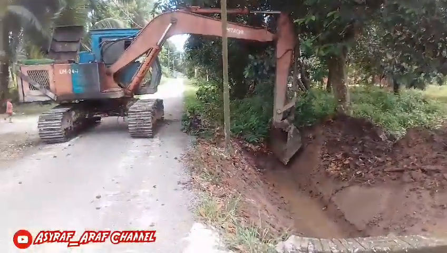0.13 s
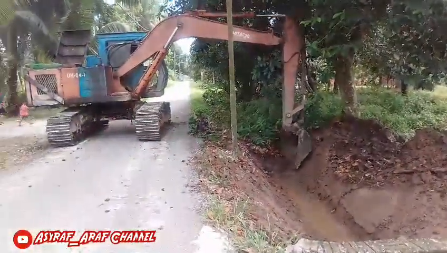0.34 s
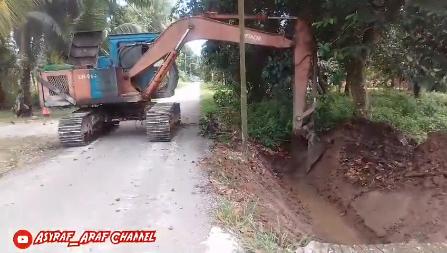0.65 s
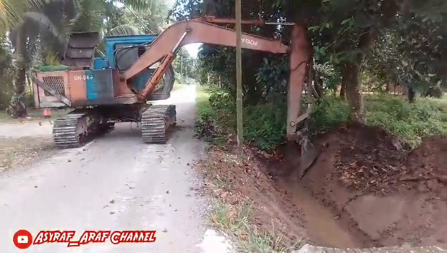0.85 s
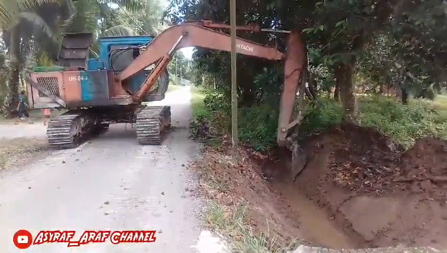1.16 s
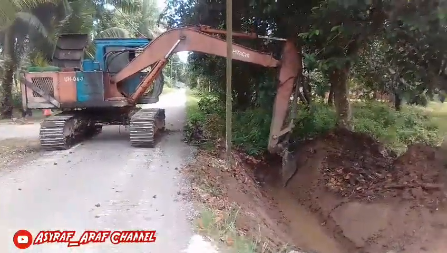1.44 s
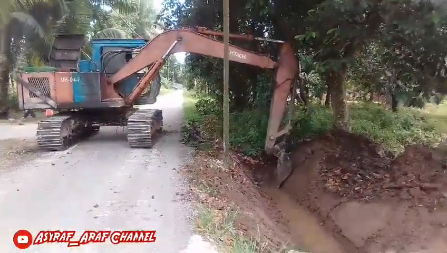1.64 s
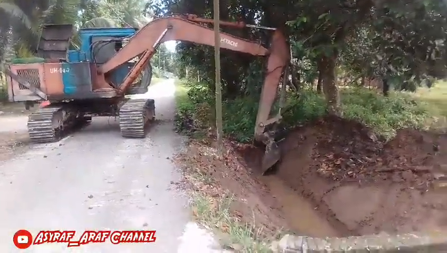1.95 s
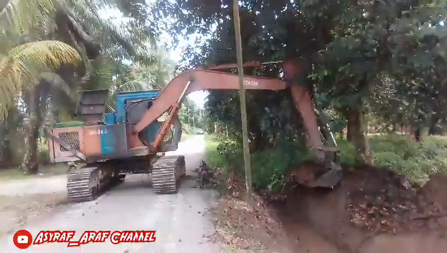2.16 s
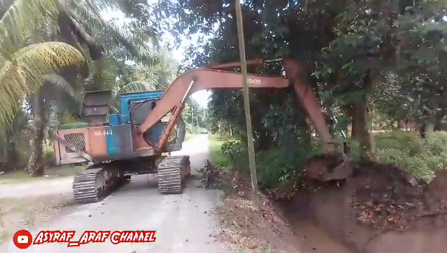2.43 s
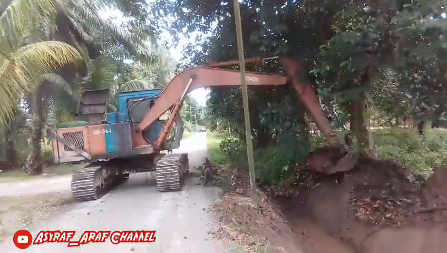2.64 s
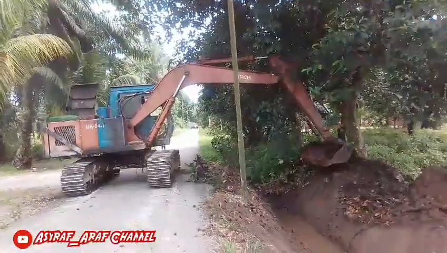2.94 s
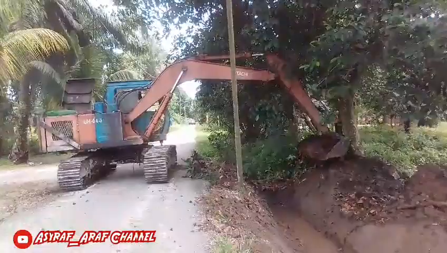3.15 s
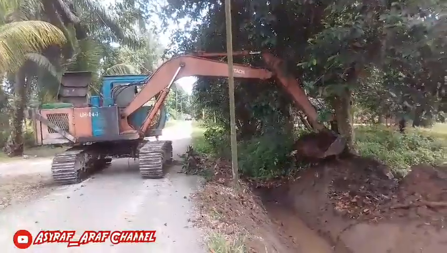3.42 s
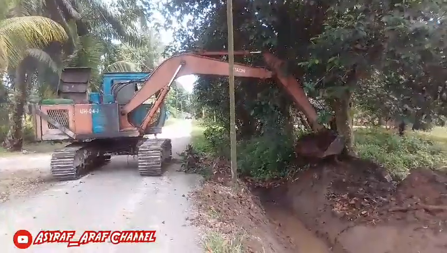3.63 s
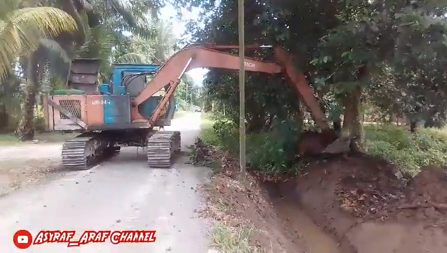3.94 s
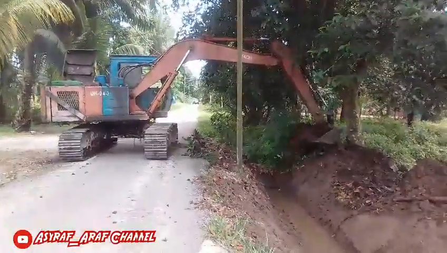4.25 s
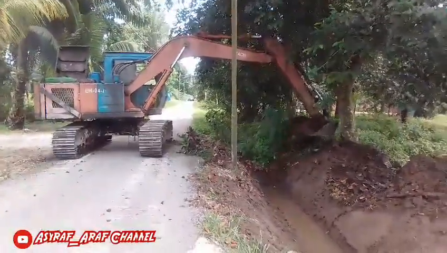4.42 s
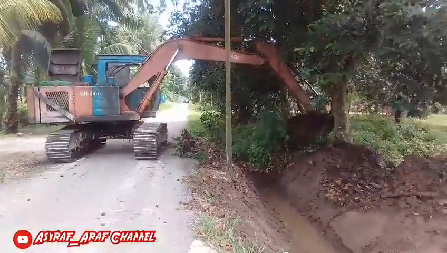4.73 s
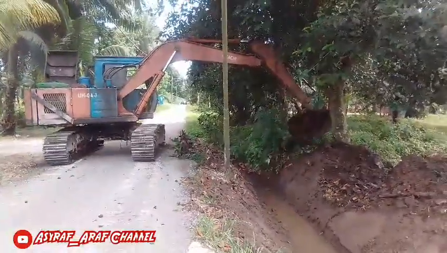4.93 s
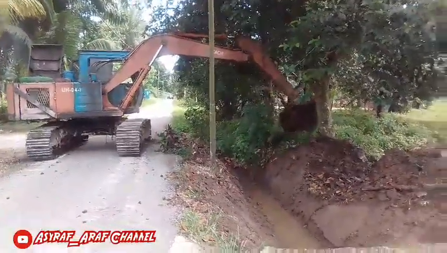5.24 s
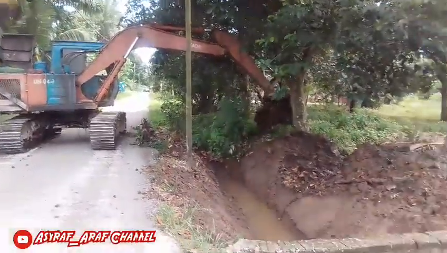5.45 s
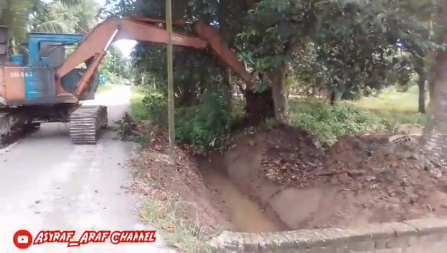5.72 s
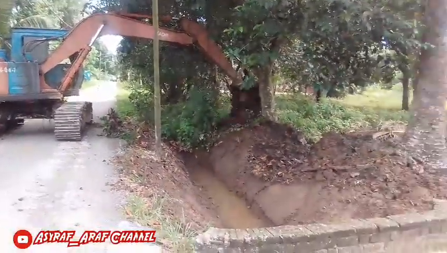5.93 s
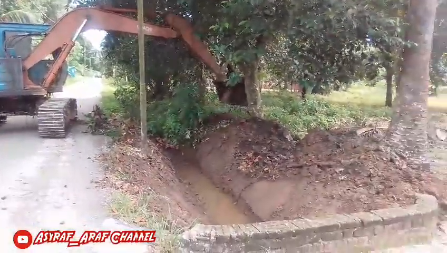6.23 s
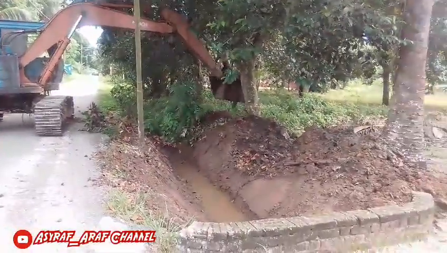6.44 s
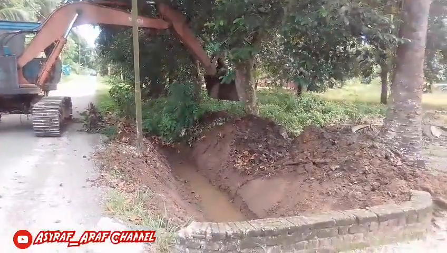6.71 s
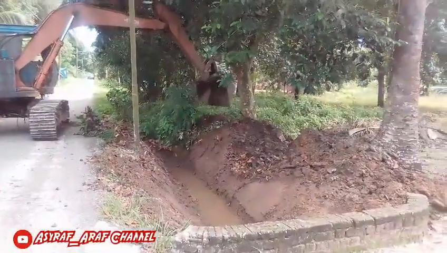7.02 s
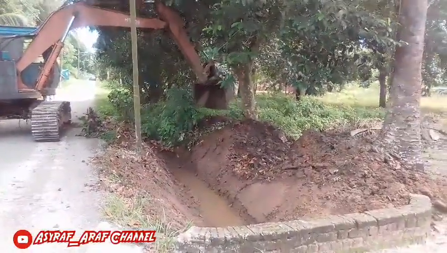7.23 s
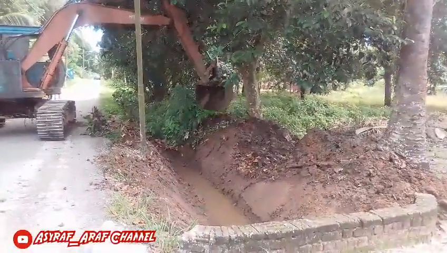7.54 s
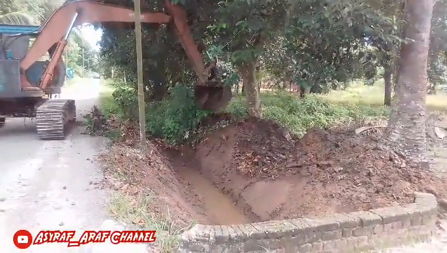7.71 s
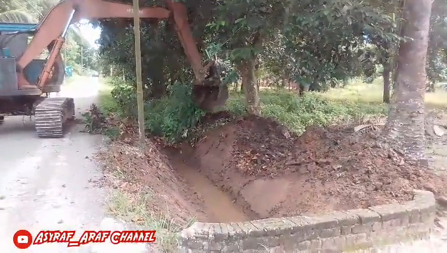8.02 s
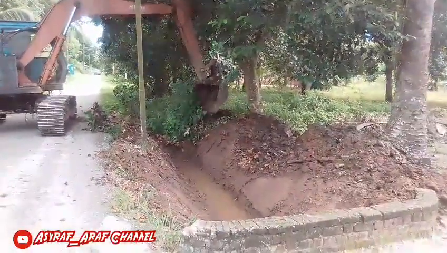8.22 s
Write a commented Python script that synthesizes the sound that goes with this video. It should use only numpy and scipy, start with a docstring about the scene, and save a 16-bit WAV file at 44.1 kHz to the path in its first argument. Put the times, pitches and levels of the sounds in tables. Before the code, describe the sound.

A diesel excavator runs steadily with a hydraulic whine while its bucket and arm clank and scrape, the sound briefly cutting out once.

```python
"""Diesel crawler excavator working a ditch a few metres off. Four cylinders fire at near-steady speed;
fan and block roar with low and mid body tones; the hydraulic pump whines and throbs. Bucket and arm clank
and shed soil: noise bursts, ringing steel, a few thin pings, all echoed by trees and the machine's body.
Small microphone: bright peak near 3.6 kHz in the roar. The sound drops out for 0.8 s."""
import sys
import numpy as np
from scipy import signal
from scipy.fft import rfft, irfft, next_fast_len
from scipy.io import wavfile

SR = 44100
rng = np.random.default_rng(int(sys.argv[2]) if len(sys.argv) > 2 else 0)


def wav_record(signal):
    """Record a signal, one row per channel, as 16-bit PCM in the file named by sys.argv[1]."""
    frames = np.transpose(np.atleast_2d(signal))
    bounded = np.clip(frames, -1, 1)
    # unit amplitude maps onto the largest positive 16-bit level
    quanta = np.round(bounded * 32767).astype(np.int16)
    wavfile.write(sys.argv[1], SR, quanta)


N = 369116
N_FFT = next_fast_len(N, True)

# thin high pings: t/s, level/dB, f/Hz, t60/s
HIGH_PINGS = [(1.458, -57, 10800, .2), (2.99, -53, 9800, .9), (3.39, -58, 9900, .6),
              (3.55, -44, 12530, 0.26), (3.86, -48, 10800, .15), (3.889, -53, 13200, .1),
              (4.15, -53, 13300, .15), (5.93, -47, 7400, .2), (6.088, -44, 7340, 0.061)]
# jolts of bucket and arm: t/s, relative level/dB, t60/s, part
JOLTS = [(.127, -17, .07, "bucket"), (.25, -20.5, 0.27, "boom"), (.272, -11, .28, "scrape"),
         (1.55, -19.5, 0.32, "boom"), (2.952, -3, 0.17, "pin"), (2.966, -8, .28, "bucket"),
         (3.008, -4, .3, "scrape"), (3.055, -13, .26, "scrape"), (3.146, -14, .15, "arm"),
         (3.165, -10.5, 0.18, "scrape"), (3.178, -15.5, .2, "boom"), (3.329, -9, 0.077, "link"),
         (3.385, -16.5, .14, "link"), (3.41, -11, .25, "scrape"), (3.44, -20, .14, "link"),
         (3.473, -15.5, .1, "link"), (3.556, -14, 0.19, "link"), (3.56, -18, 0.22, "base"),
         (3.92, -16.5, 0.41, "scrape"), (4.226, -13.5, 0.37, "scrape"), (4.485, -16, .29, "link"),
         (4.519, -12, .25, "plate"), (4.545, -10.5, .33, "scrape"), (4.785, -12.5, 0.18, "bucket"),
         (5.036, -16, .09, "link"), (5.297, -7, .13, "pin"), (5.3, -9, .15, "plate"),
         (5.309, -15, 0.27, "arm"), (5.824, -17, .4, "arm"), (5.866, -11.5, .2, "scrape"),
         (5.911, -3, 0.15, "bucket"), (5.925, -6.5, 0.4, "scrape"), (5.95, -15.5, .22, "boom"),
         (6.012, -13, .5, "bucket"), (6.08, -15, 0.46, "scrape"), (6.28, -23, 0.31, "boom"),
         (6.871, -18, .15, "base"), (6.89, -17, 0.1, "bucket"), (7.354, -25, .12, "tooth")]
# struck or scraped part -> rise/s, thud/dB, treble/dB, low ring f/Hz, high ring f/Hz
STRUCK_PARTS = {"boom": (.005, 3.5, -37.5, 298, 3601), "bucket": (.0022, -1.5, -39, 800, 3480),
                "plate": (.003, -8, -26, 400, 5400), "scrape": (.008, -2, -35, 880, 3720),
                "link": (.003, -2.5, -42, 750, 2550), "arm": (.003, 2.5, -43, 800, 2050),
                "pin": (.003, -14, -19.5, 700, 3900), "tooth": (.002, -10, -2, 800, 4100),
                "base": (.006, 6, -36, 205, 2750)}
# noise spectrum of a jolt: f/Hz, relative density/dB
JOLT_SPECTRUM = [(59, -40.5), (100, -6), (205, -7.5), (254, -2), (532, -8.5), (701, -7), (779, -9.5),
                 (2340, -10.5), (3500, -8.5), (5700, -24), (15700, -55.5)]
# steel modes of bucket and arm: f/Hz, gain/dB, t60/s
STEEL_MODES = [(196, 10, .12), (295.4, 8.5, 0.12), (402, 4, 0.11), (563, -2, 0.13), (720, -2, 0.092),
               (865, 2.5, 0.032), (997, -6.5, .1), (1419, 4, 0.13), (1760, -1.5, .08), (2040, 1, 0.087),
               (2484, -1.5, .08), (2810, 0, 0.061), (3050, -10, .08), (3405, 1.5, 0.04), (3503, -4.5, 0.11),
               (3534, -4, .1), (3640, 0.5, 0.054), (3850, -6.5, 0.14), (4060, -1, 0.071),
               (4370, -1.5, 0.037), (5280, -6.5, 0.092)]
# fan and block roar: t/s, level/dB, mid and treble gain/dB
ROAR_LEVELS = [(0, -24.5, -5.5), (.43, -22.5, -6), (.8, -25, -6), (1.8, -25, -5), (2.63, -27.5, -4),
               (3.1, -24, -2.5), (3.55, -22.5, -5.5), (4.05, -25.5, -5), (4.6, -25, -1.5),
               (5.2, -24.5, -3.5), (6.4, -25.5, -4.5), (7.1, -26.5, -2.5), (8.37, -26, -4)]
# roar spectrum: f/Hz, relative density/dB
ROAR_SPECTRUM = [(30, -44), (66, -30.5), (95, -19), (130, -14.5), (200, -7), (370, -15), (630, -14.5),
                 (1100, -14.5), (2000, -14.5), (3790, -10.5), (5500, -26), (7500, -37.5), (10500, -45),
                 (16000, -56.5)]
# roar peaks (low and mid body tones, microphone's bright peak near 3.6 kHz): f/Hz, width/Hz, lift/dB
ROAR_PEAKS = [(302, 49, 3), (798, 166, 7), (960, 58, 5.5), (3500, 330, 0.5), (3890, 600, 3.5),
              (4530, 760, 2.5)]
# pump whine: t/s, 1st harmonic level/dB, 3rd harmonic level/dB, beating order/1st (amplitude ratio)
PUMP_LEVELS = [(0, -35, -44.5, .7), (.42, -32, -47, .6), (.8, -35, -55, .3), (1.3, -32.5, -44, .15),
               (1.8, -33.5, -51, .2), (2.7, -33, -43.5, .3), (3.4, -34.5, -44, .3), (4.3, -33.5, -42, .6),
               (4.9, -32.5, -40.5, .3), (5.6, -38.5, -43, .7), (6.1, -41.5, -39, .8),
               (6.8, -39.5, -40.5, .3), (7.4, -38, -41.5, .8), (8.37, -37.5, -39.5, .8)]
# other pump overtones: harmonic number, level/dB re 3rd
PUMP_OVERTONES = [(2, -3), (4, -1.5), (5, -6.5)]
# engine speed, sagging under load: t/s, firing rate/Hz
FIRING_RATE = [(0, 58.3), (1.8, 58.3), (2.7, 57.9), (3.05, 57.8), (3.35, 58.2), (4.2, 58.3), (4.55, 57.4),
               (4.9, 57.4), (5.45, 57.8), (6.05, 58.1), (6.9, 58.1), (7.3, 57.95), (8.37, 58)]
# 2nd firing harmonic: t/s, level/dB
SECOND_HARMONIC = [(0, -38), (1.2, -37.5), (2.8, -41.5), (4.2, -39), (4.8, -47.5), (5.6, -41), (6.3, -45.5),
                   (6.9, -42), (7.3, -45), (8.37, -40.5)]
# weak engine orders: multiple of firing rate, level/dB
WEAK_ORDERS = [(2.5, -58), (3.5, -51), (4, -48.5), (5, -47.5), (7.5, -45.5)]


def amp(db):
    """dB to gain."""
    return 10 ** (np.asarray(db) / 20)


def unit_rms(x):
    """Scale to rms 1."""
    return x / np.sqrt(np.mean(x ** 2) + 1e-20)


def curves(table):
    """Columns after t/s, interpolated per sample."""
    times_s, *columns = np.transpose(table)
    return [np.interp(np.arange(N) / SR, times_s, column) for column in columns]


def drift(rate_hz):
    """Low-passed random wander, rms 1."""
    step = 40
    pole = np.exp(-2 * np.pi * rate_hz * step / SR)
    noise = rng.standard_normal(N // step + 2002)
    slow = signal.lfilter([1], [1, -2 * pole, pole * pole], noise)[2000:]
    return np.interp(np.arange(N) / step, np.arange(len(slow)), unit_rms(slow))


def noise_bands(spectrum, low_hz, high_hz, peaks=()):
    """Coloured noise with resonant peaks, split into low, mid, high."""
    hz = np.arange(1, N_FFT // 2 + 2) * SR / N_FFT
    points_hz, points_db = np.transpose(spectrum)
    db = np.interp(np.log(hz), np.log(points_hz), points_db)
    for centre_hz, width_hz, lift_db in peaks:
        db += lift_db / (1 + (2 * (hz - centre_hz) / width_hz) ** 2)
    bins = rfft(rng.standard_normal(N_FFT)) * amp(db)
    low, high = 1 / (1 + (hz / low_hz) ** 4), 1 / (1 + (high_hz / hz) ** 4)
    return [irfft(bins * share, N_FFT)[:N] for share in (low, 1 - low - high, high)]


def ring(force, hz, t60_s):
    """Damped mode: a unit click rings a sine of height 1."""
    r, w = amp(-60 / (t60_s * SR)), 2 * np.pi * hz / SR
    return signal.lfilter([0, np.sin(w)], [1, -2 * r * np.cos(w), r * r], force + 1e-18)


def tone(cycles, multiple, rms_db):
    """Sine on a multiple of a cycle count, random phase."""
    return np.sqrt(2) * amp(rms_db) * np.sin(2 * np.pi * (multiple * cycles + rng.random()))


def echoes(x, wet_db=-13, t60_s=.39, gap_s=.012):
    """Direct sound plus dense, fading scatter off trees and machine body."""
    t = np.arange(round(.4 * SR)) / SR
    scatter = rng.standard_normal(len(t)) * amp(-60 * t / t60_s) * (t > gap_s)
    scatter = unit_rms(scatter) / np.sqrt(len(t))
    return x + amp(wet_db) * signal.fftconvolve(x, scatter)[:N]


def pings():
    """Short high tones: sudden start, slightly rough decay."""
    out = np.zeros(N)
    for start_s, db, hz, t60_s in HIGH_PINGS:
        t = np.arange(round(t60_s * SR)) / SR
        out[round(start_s * SR):][:len(t)] += amp(db - 60 * t / t60_s) * np.sin(2 * np.pi * hz * t)
    return out * amp(5.2 * drift(150))


def clanks(crash_db=-11, steel_db=-22, strike_db=13, grains_per_s=900, db_per_octave=22):
    """Each jolt: a blow and a dying rattle. Both ring steel modes near the part's ring frequencies."""
    modes_hz = np.array(STEEL_MODES)[:, 0]
    band_powers = np.zeros((3, N))
    rattle_envs, strikes = np.zeros((2, len(STEEL_MODES), N))
    spreads = rng.standard_normal((len(JOLTS), len(STEEL_MODES)))
    for (start_s, db, t60_s, part), spread in zip(JOLTS, spreads):
        rise_s, thud_db, treble_db, low_hz, high_hz = STRUCK_PARTS[part]
        t, at = np.arange(round(t60_s * SR)) / SR, round(start_s * SR)
        envelope = (1 - np.exp(-t / rise_s)) * amp(db - 60 * t / t60_s)
        band_powers[:, at:at + len(t)] += (envelope * amp([[thud_db], [0], [treble_db]])) ** 2
        low_db = thud_db - db_per_octave * abs(np.log2(modes_hz / low_hz))
        high_db = -db_per_octave * abs(np.log2(modes_hz / high_hz))
        coupling = amp(np.maximum(low_db, high_db))
        rattle_envs[:, at:at + len(t)] += coupling[:, None] * envelope
        sharpness = min(1, .0025 / rise_s)   # slow scrape, weak blow
        blow = np.sign(spread) * amp(db + strike_db + 2.4 * spread) * sharpness
        strikes[:, at + round(rise_s * SR)] += coupling * blow
    chatter = amp(1.6 * drift(90))   # loose parts
    bands = noise_bands(JOLT_SPECTRUM, low_hz=1240, high_hz=6480)
    crash = sum(unit_rms(band) * np.sqrt(power) for band, power in zip(bands, band_powers))
    grains = (rng.random(N) < grains_per_s / SR) * rng.standard_normal(N)
    steel = np.zeros(N)
    for (hz, db, t60_s), envelope, strike in zip(STEEL_MODES, rattle_envs, strikes):
        rattle = np.roll(grains, rng.integers(N)) * envelope * chatter
        steel += amp(db) * ring(rattle + strike, hz, t60_s)
    mix = amp(crash_db) * crash * chatter + amp(steel_db) * steel
    return signal.sosfilt(signal.butter(2, 130, "high", fs=SR, output="sos"), mix)


def roar(firings, knock_depth=.0505, waver_db=.62):
    """Fan and block noise with body tones and microphone peak; each firing swells the upper bands."""
    level_db, bright_db = curves(ROAR_LEVELS)
    low, mid, high = noise_bands(ROAR_SPECTRUM, low_hz=1333, high_hz=6000, peaks=ROAR_PEAKS)
    knock = 1 + knock_depth * np.cos(2 * np.pi * firings)
    upper = mid * amp(waver_db * drift(11.7)) + high * amp(waver_db * drift(27))
    lower = low * amp(waver_db * drift(2.9))
    return amp(level_db) * (lower + upper * knock * amp(bright_db)) / np.std(low + mid + high)


def pump(firings, strokes_per_firing=4.461, beat_hz=2.273, beat_dip_s=.13):
    """Piston pressure ripple, beating against an engine order just above; rough overtones."""
    first_db, third_db, beat_depth = curves(PUMP_LEVELS)
    t = np.arange(N) / SR
    strokes = strokes_per_firing * firings
    beat = 1 - beat_depth * np.exp(2j * np.pi * beat_hz * (t - beat_dip_s))
    ripple = np.imag(beat * np.exp(2j * np.pi * strokes))
    whine = np.sqrt(2) * amp(first_db + 1.5 * drift(10)) * ripple
    whine += tone(strokes + .018 * drift(9.4), 3, third_db + 4.4 * drift(14))
    for harmonic, db in PUMP_OVERTONES:
        whine += tone(strokes + .03 * drift(12), harmonic, third_db + db + 3.7 * drift(26))
    return whine


def diesel(firings, firing_hz, first_db=-47.5, third_db=-40.5, nominal_hz=58, load_db_per_hz=4.5):
    """Exhaust hum; the fundamental grows as speed sags. Uneven cylinders add weak, wavering orders."""
    second_db, = curves(SECOND_HARMONIC)
    load_db = load_db_per_hz * (nominal_hz - firing_hz)
    hum = tone(firings, 1, first_db + load_db + .9 * drift(7.2))
    hum += tone(firings, 2, second_db + 1.1 * drift(7.2))
    hum += tone(firings, 3, third_db + 2.5 * drift(7.2))
    return hum + sum(tone(firings, order, db + 4.5 * drift(14)) for order, db in WEAK_ORDERS)


def scene():
    """Excavator from the roadside, mono; one firing count drives hum, whine and knock."""
    firing_hz, = curves(FIRING_RATE)
    firings = np.cumsum(firing_hz) / SR
    machine = diesel(firings, firing_hz) + pump(firings) + roar(firings)
    return (machine + echoes(clanks() + pings()))[None]


def record(dry, bass_cut_hz=42, top_cut_hz=15850, dropout_s=(1.8253, 2.6248)):
    """Bass cut, soft clip, dropout, top cut, DC offset of one 16-bit step."""
    t = np.arange(N) / SR
    live = (t < dropout_s[0]) | (t >= dropout_s[1])
    highpass = signal.butter(4, bass_cut_hz, "high", fs=SR, output="sos")
    lowpass = signal.ellip(12, .5, 70, top_cut_hz, fs=SR, output="sos")
    rounded = .84 * np.tanh(signal.sosfilt(highpass, dry) / .79)
    return signal.sosfilt(lowpass, rounded * live) + 2. ** -15


dry = scene()
out = record(dry)
wav_record(out)
```